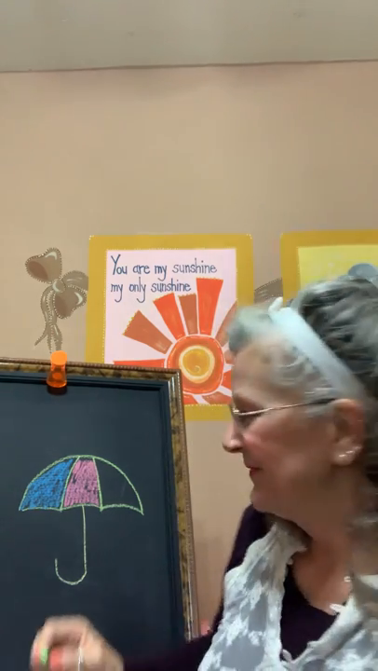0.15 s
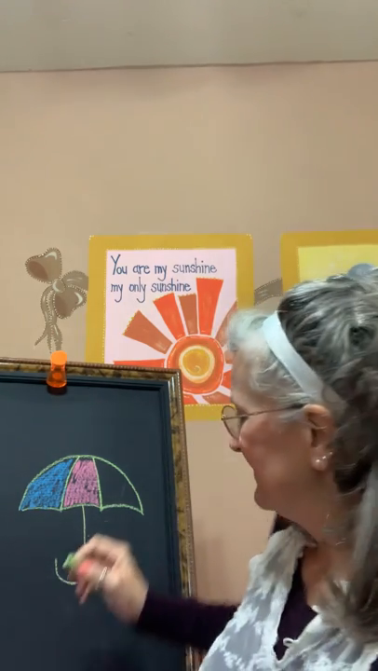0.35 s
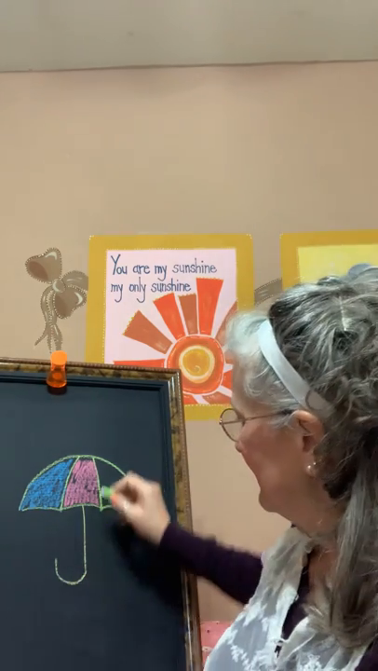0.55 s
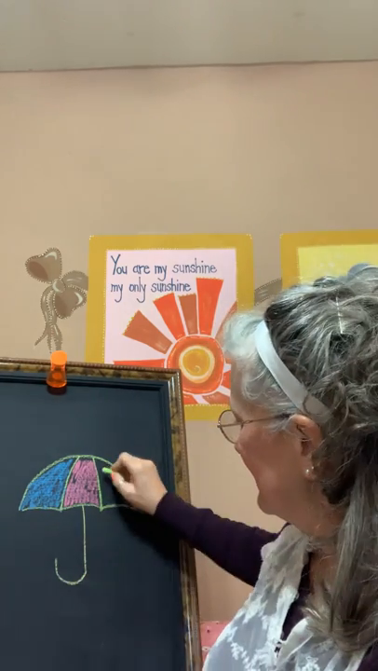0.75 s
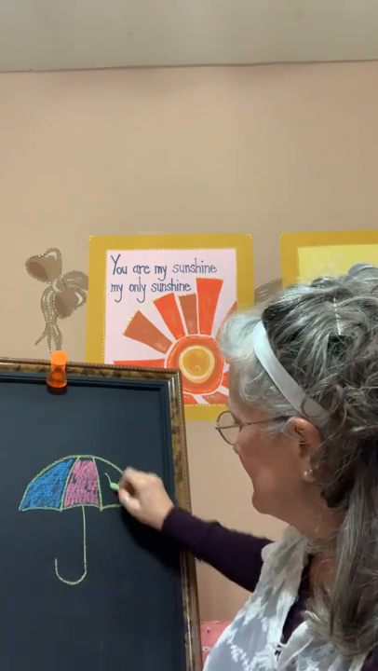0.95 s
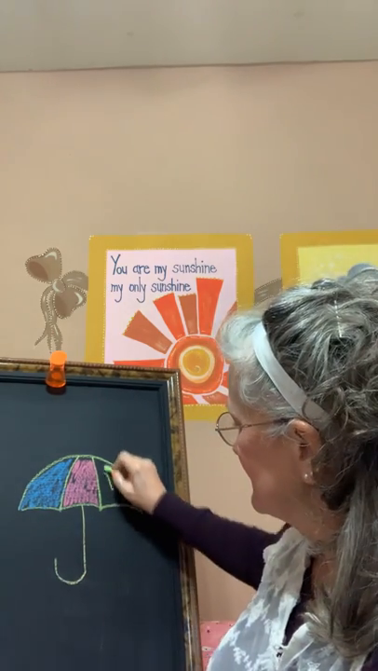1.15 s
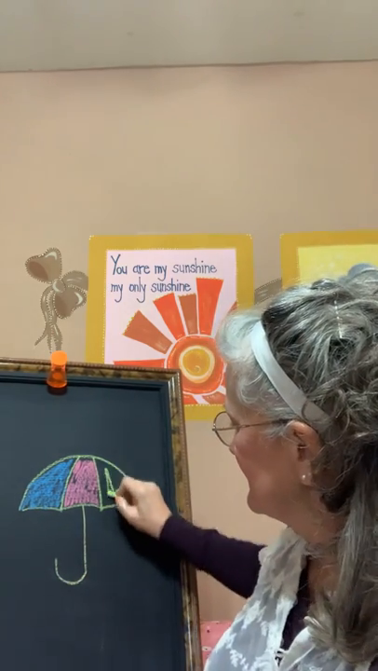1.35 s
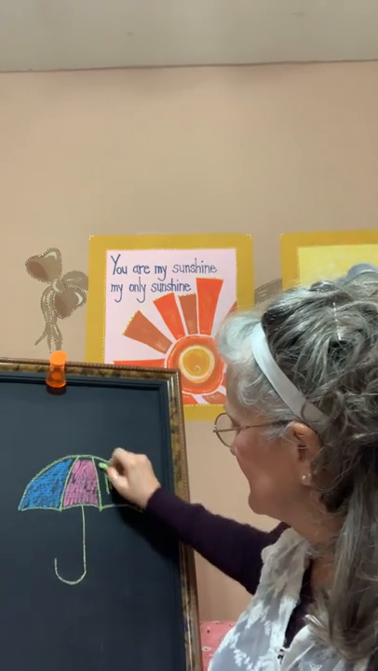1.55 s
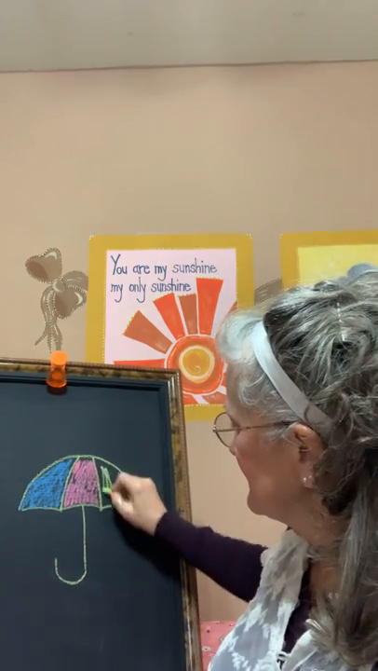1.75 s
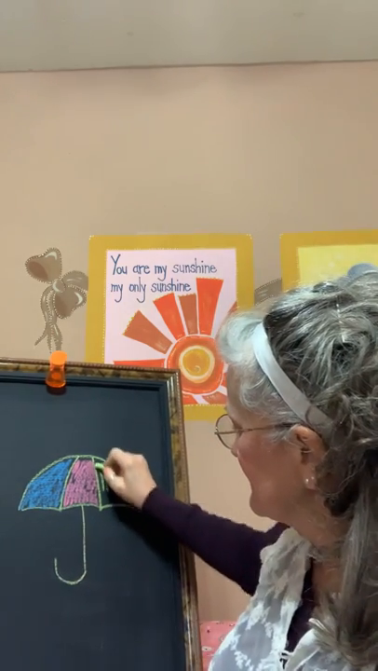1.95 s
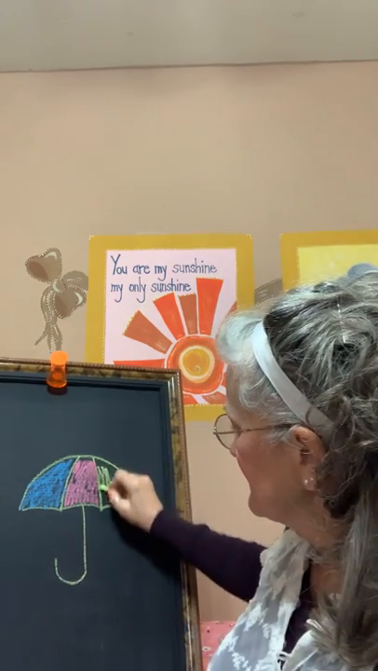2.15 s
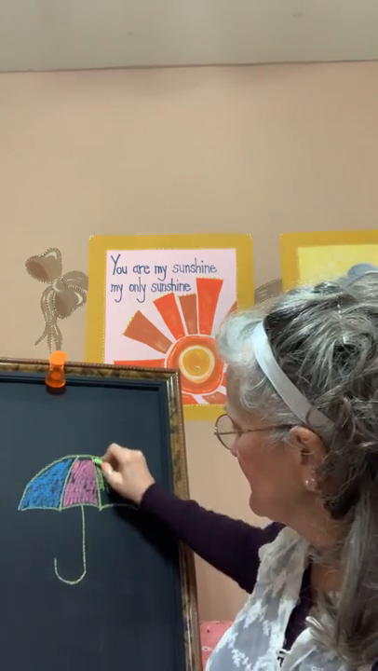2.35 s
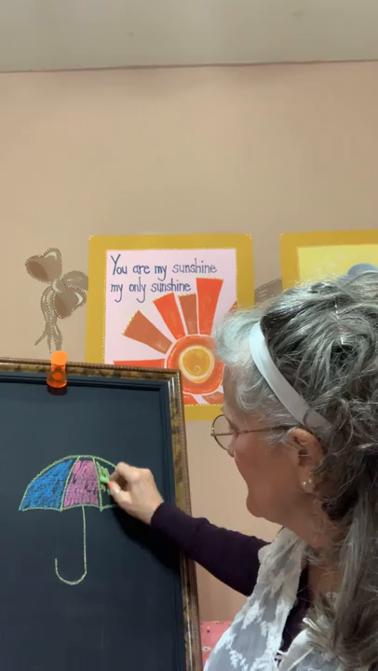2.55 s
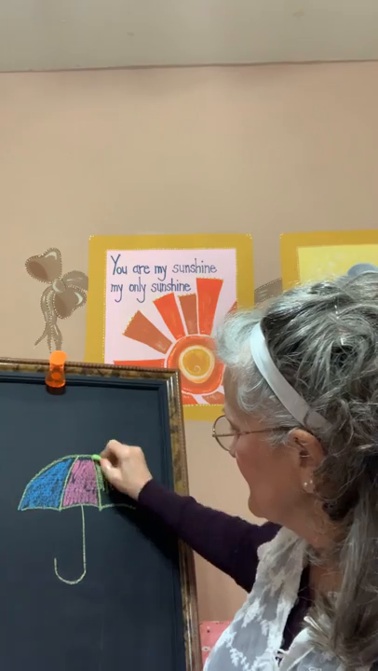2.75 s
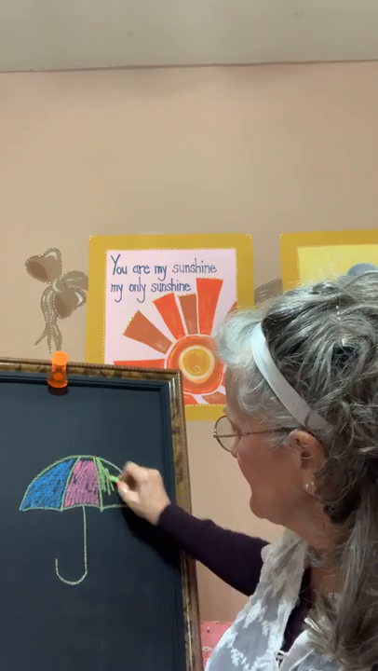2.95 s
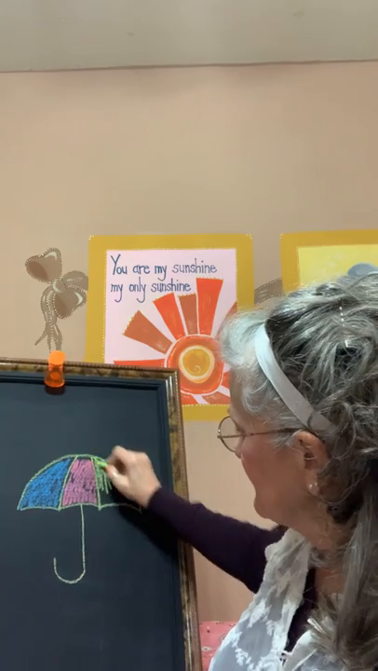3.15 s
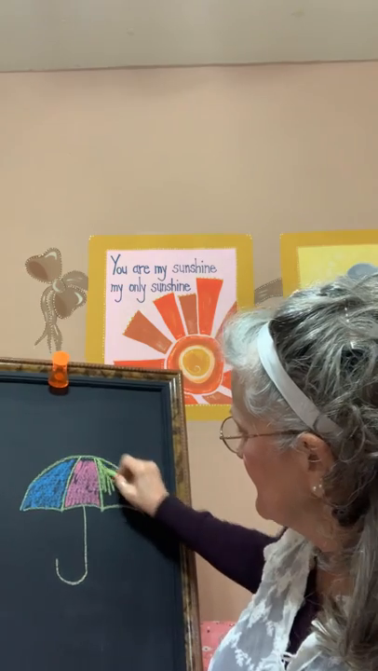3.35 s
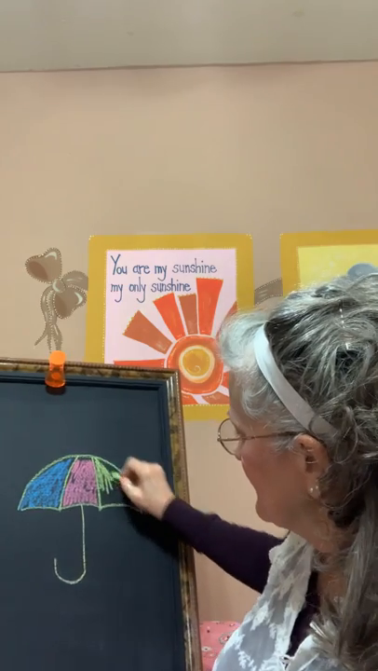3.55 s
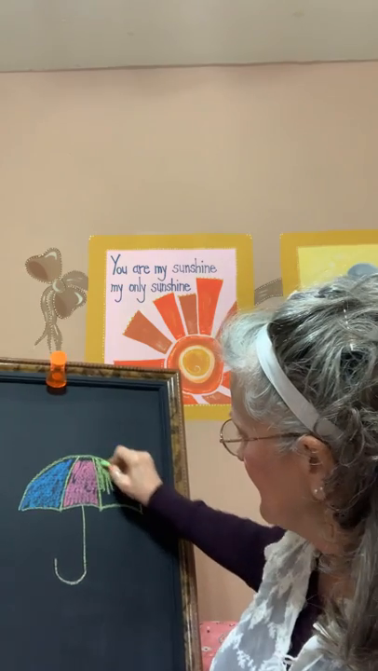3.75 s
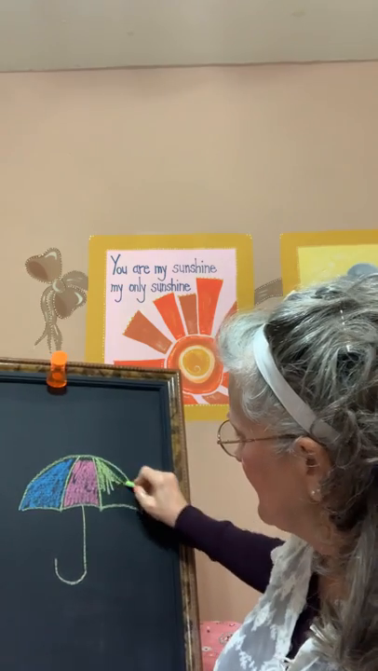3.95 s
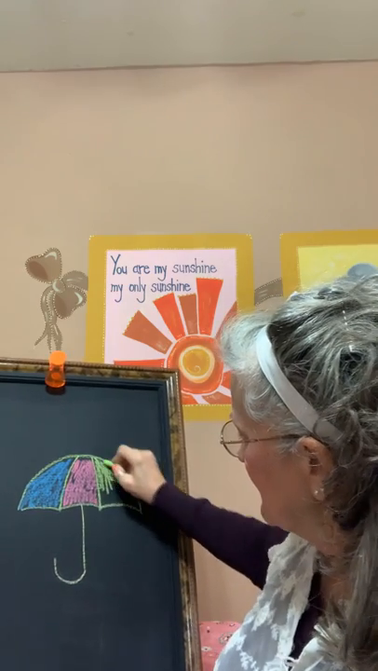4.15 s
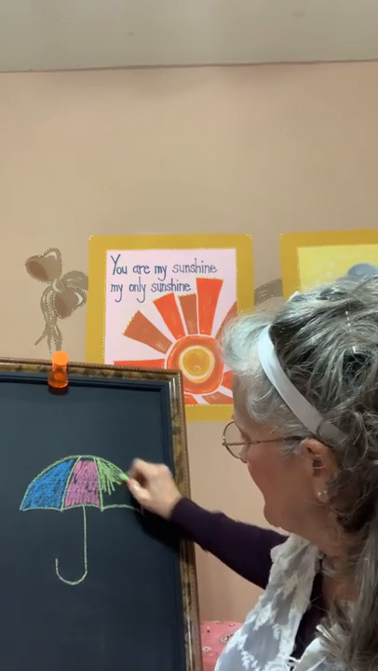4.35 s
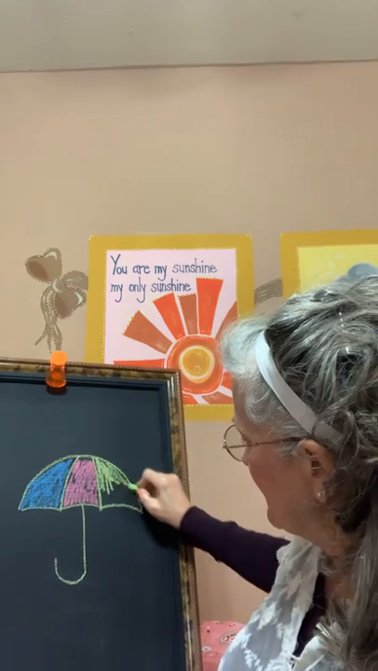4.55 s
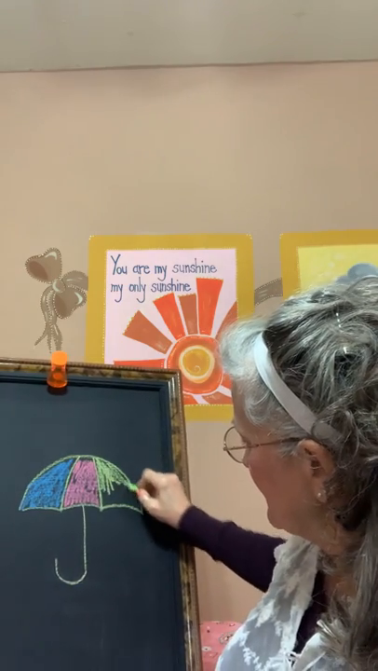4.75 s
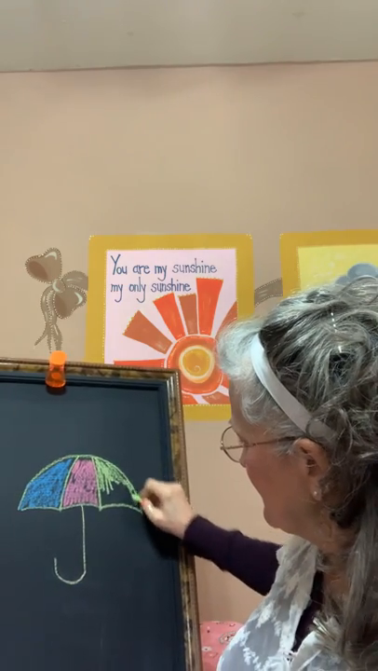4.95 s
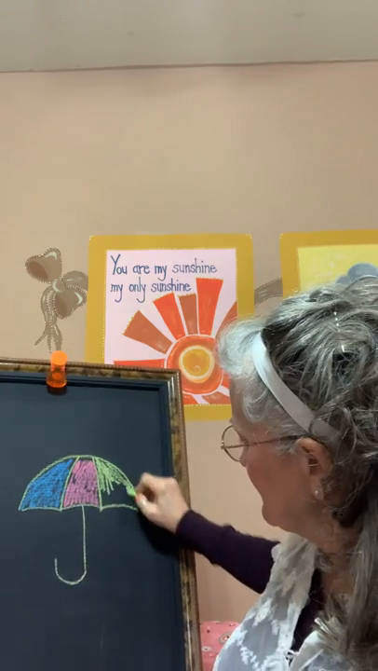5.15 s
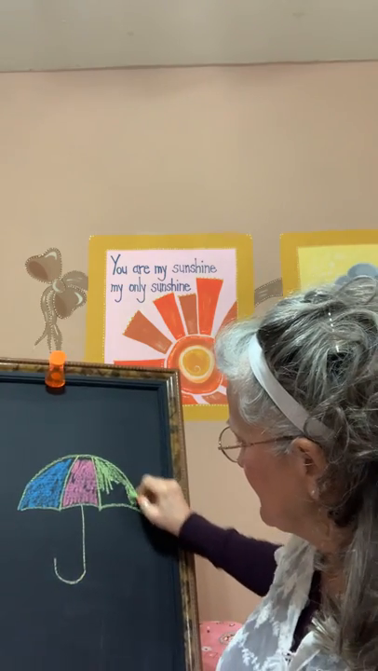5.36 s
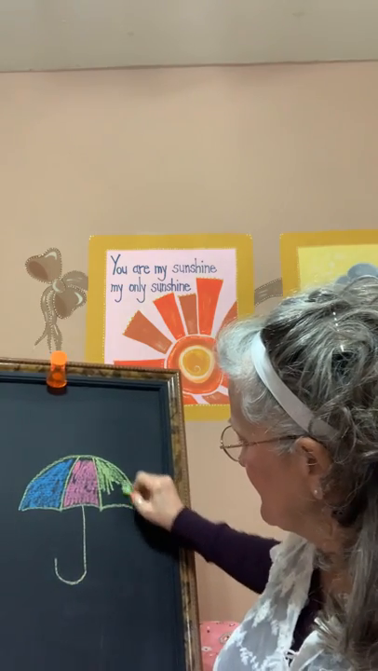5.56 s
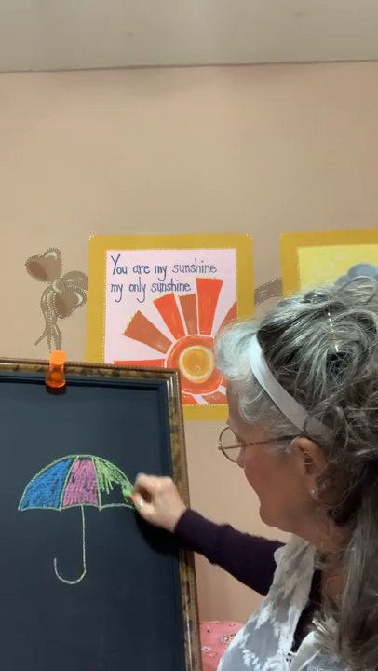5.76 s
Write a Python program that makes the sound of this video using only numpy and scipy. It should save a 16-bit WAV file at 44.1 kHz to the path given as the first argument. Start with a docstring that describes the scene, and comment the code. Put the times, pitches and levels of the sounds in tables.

```python
"""First a sleeve rustles as an arm rises, cloth sliding over cloth while its folds flap.
Then chalk knocks on a framed chalkboard and shades up and down. Each stroke hisses with its speed as
grains break off; chiefly on the down strokes the tip also sticks and slips, so the panel drums.
Toward the end the shading nears the frame, where the stiffer panel sounds hollower, and then it stops.
Throughout, a small room adds its reflections and a faint steady background."""
import sys
import numpy as np
from scipy import signal
from scipy.fft import rfft, irfft
from scipy.io import wavfile
from scipy.ndimage import uniform_filter1d

SR = 44100
rng = np.random.default_rng(int(sys.argv[2]) if len(sys.argv) > 2 else 0)


def dump_mix(stems):
    """Bounce the given channels to the path in sys.argv[1] as a 16-bit WAV at rate SR."""
    frames = np.atleast_2d(stems).T  # one column per channel
    limited = np.clip(frames, -1, 1)  # hard clip at full scale
    pcm = np.round(limited * 32767).astype(np.int16)
    wavfile.write(sys.argv[1], SR, pcm)


N = 256662
TIME = np.arange(N) / SR

# Strokes, up and down by turns, each lasting until the next; hold < 1 is a flick, > 1 an even pace:
# (start [s], relative hiss level [dB], treble tilt [dB], hold [exponent], judder level [dB])
STROKES = [(0.895, -58.5, -2.5, 1.27, -64.5), (1.079, -58, -0.5, 1.45, -48),
           (1.256, -55.8, 0.8, 1.7, -61.5), (1.443, -55, -3, 1.14, -45.5), (1.627, -53.5, 1.5, 0.86, -55.5),
           (1.822, -56, -4.5, 1.17, -44.5), (2.022, -52, 1, 0.52, -58.5), (2.203, -55, -1.5, 0.82, -45.5),
           (2.444, -57.4, -0.5, 0.66, -57), (2.632, -59.5, -3, 0.99, -40.5), (2.842, -56.5, 1.5, 0.87, -56),
           (3.08, -56, -4.5, 0.95, -42), (3.308, -56, 0.3, 0.83, -55), (3.548, -53.5, -1.5, 0.84, -43),
           (3.784, -54, 3.2, 0.79, -56.5), (4.024, -53.5, 1, 0.86, -43), (4.286, -54.5, 4, 0.87, -61),
           (4.559, -58.5, -11, 0.99, -47), (4.746, -57, -3, 1.09, -65), (4.957, -56, -9.5, 1.13, -44),
           (5.15, -57.5, -1.5, 1.05, -69), (5.348, -55, -5.4, 1.33, -45), (5.536, -54.6, 0.5, 0.95, -66.5),
           (5.746, -60, -9, 1.2, -45)]
LAST_STROKE_END_S = 5.956
# The tip lands or catches: (time [s], relative clack level [dB], relative thump level [dB])
KNOCKS = [(0.885, -54, -45.5), (1.388, -59.5, -51), (2.48, -67.5, -59), (3.334, -80, -48),
          (3.738, -73.5, -34.5), (3.785, -74, -46)]
# Resonances of the panel and its frame: (frequency [Hz], width [Hz], lift [dB])
BOARD_MODES = [(91.3, 27, 6.5), (112.8, 25.3, 8), (162.7, 25, 6), (197.7, 39.6, 11.5), (262, 12.4, 4.5),
               (306.2, 28, 8.5), (356, 20, 4.5), (389.3, 49, 9), (497, 29.4, 7.5), (540, 34, 4),
               (671, 46, 8), (734.6, 23.5, 6.5), (805, 8.8, 4), (873, 61, 6), (1037, 73, 1),
               (1060, 46, 7.5), (1171, 18, 7), (1376, 50, 8.5), (1540, 140, 2), (1803, 110, 2.5),
               (2070, 56, 4), (2326, 26, 6.5), (2980, 270, 3), (3520, 46, 6), (3700, 120, 2.5)]
# Spectra of the chalk's friction and impacts: (frequency [Hz], relative level [dB])
GRIT_SPECTRUM = [(40, -9.5), (100, 0), (250, -1), (600, 1.5), (1300, -0.5), (2200, -0.5), (3400, 0),
                 (4600, -3.5), (7000, -6), (10500, -11), (13000, -17), (16000, -19.5)]
SLIP_SPECTRUM = [(30, -25.5), (65, -11.5), (95, -3), (150, 4.5), (200, 2.5), (290, 0), (390, -1), (600, -5),
                 (1300, -12), (2000, -18), (3200, -30), (6000, -31), (16000, -61)]
CLACK_SPECTRUM = [(60, -11), (300, -7.5), (600, -5), (850, 1.5), (1400, -2), (2500, -9), (4000, -28),
                  (8000, -32), (16000, -48)]
THUMP_SPECTRUM = [(30, -26), (90, -1), (190, 10.5), (350, -9), (700, -17), (3000, -79), (16000, -73)]
# The stick rings more when pushed up than when pulled down: (frequency [Hz], gain [dB])
PUSH_COLOUR = [(100, 0), (200, -7.5), (330, -7.5), (510, 1), (1000, -0.5), (2400, -1), (3100, -1),
               (3750, 1), (5000, 0.5), (16000, 1)]
# The shading works its way across to the frame: (time [s], nearness [0-1])
FRAME_NEARNESS = [(4.3, 0), (4.55, 1)]
# Colour of the stiffer panel there: (frequency [Hz], gain [dB])
FRAME_COLOUR = [(60, -5), (100, -11.5), (150, 5.5), (230, -2.5), (320, 2), (450, 2), (590, -6.5),
                (950, 0.5), (1400, -3.5), (2400, 0.5), (4200, 2), (8000, -2.5), (13000, 0.5)]
# Spectra of sliding cloth, flapping folds and the background: (frequency [Hz], relative level [dB])
SLIDE_SPECTRUM = [(100, -17), (900, 10.5), (2000, 0.5), (3500, 1), (5600, -1), (7500, -13), (12000, -19),
                  (16000, -25)]
FLAP_SPECTRUM = [(30, -27), (70, -10), (110, 0), (150, -4.5), (250, -6.5), (550, -11), (1000, -25.5),
                 (1800, -28.5), (16000, -48)]
BACKGROUND_SPECTRUM = [(25, -27), (65, -3), (90, -3), (115, -0.5), (160, -13), (250, -16.5), (650, -19),
                       (1500, -26.5), (5000, -34), (13000, -37), (16000, -53)]
# Reverberation time of the room: (frequency [Hz], time to fall 60 dB [s])
ROOM_T60 = [(150, 0.76), (1000, 0.14), (4000, 0.04), (14000, 0.04)]
# Reflections relative to the direct sound: (frequency [Hz], level [dB])
ROOM_REFLECTIONS = [(100, -8.5), (500, -9.5), (1500, -2.5), (5000, -3), (14000, -11)]


def chalk_hiss(speed, upward, hiss_db, bright_db, creep=0.1, slow_treble_db=-16):
    """Abrasion: countless grains break off the tip, louder and brighter the faster it slides."""
    tilt_db = bright_db + slow_treble_db * (1 - speed)
    grains = rng.standard_normal(N) * gain_of(wander(500) + 0.77 * wander(38))
    # (frequency [Hz], share of the tilt [ratio])
    treble_share = [(1300, -0.27), (3500, 0.14), (10000, 0.8), (16000, 0.79)]
    streak_depth = [(300, .5), (1500, 2), (16000, 2.2)]  # (frequency [Hz], rms depth [dB])

    def colour_db(hz, s):
        tilt = at_frequency(treble_share, hz) * np.interp(s, TIME, tilt_db)
        push = at_frequency(PUSH_COLOUR, hz) * np.interp(s, TIME, upward)
        # the travelling tip meets the panel's high modes at changing places
        return tilt + push + at_frequency(streak_depth, hz) * streaks(tilt.shape)

    hiss = recolour(unit_rms(grains), colour_db, size=512)
    touching = TIME > STROKES[0][0]
    envelope = touching * gain_of(hiss_db + 4) * (creep + speed ** 1.15)
    return resonate(hiss * envelope, GRIT_SPECTRUM, BOARD_MODES)


def chalk_judder(progress, speed, upward, judder_db, open_hz=238.6, frame_hz=299.6, sag_octaves=.35):
    """Stick-slip friction: each slip kicks the panel, at an unsteady rate that sags along the stroke."""
    mid_stroke_hz = open_hz + (frame_hz - open_hz) * nearness(TIME)
    rate_hz = mid_stroke_hz * 2 ** (sag_octaves * (.5 - progress))
    cycles = np.cumsum(rate_hz * np.exp(.4 * wander(160))) / SR
    slips = np.diff(np.floor(cycles), prepend=0) * gain_of(2.17 * wander(260))
    kicks = disperse(unit_rms(slips - uniform_filter1d(slips, size=600)))
    # slow slips are soft, fast ones sharp
    tilt_db = -9 * (1 - speed)
    treble_share = [(350, 0.012), (1200, 0.93)]  # (frequency [Hz], share of the tilt [ratio])
    kicks = recolour(kicks, lambda hz, s: at_frequency(treble_share, hz) * np.interp(s, TIME, tilt_db))
    # after a turn the tip stays stuck for a moment, then breaks loose
    stuck, grip, release = 0.022, 0.073, 0.17  # shares of the stroke
    pressure = np.clip((progress - stuck) / grip, 0, 1) * np.clip((1 - progress) / release, 0, 1)
    lean_db = np.where(upward, 2, 3.5)  # the hand bears down along the stroke, less so going up
    force_db = judder_db + lean_db * np.interp(progress, [.2, .65], [-.5, .5]) + 1.2 * wander(40)
    swell_db = 3 * (speed - .5)  # faster sliding kicks harder
    return resonate(kicks * pressure * gain_of(force_db + swell_db), SLIP_SPECTRUM, BOARD_MODES)


def chalk_knocks(blow_db=24.5, chatter_db=-13, chatter_s=0.028):
    """Impact excitation: a blow of the tip clacks and thumps, with a brief chatter as it settles."""
    clacks, thumps = np.zeros((2, N))
    t = TIME[:SR // 10]
    for start_s, clack_db, thump_db in KNOCKS:
        chatter = gain_of(chatter_db) * rng.standard_normal(len(t)) * np.exp(-t / chatter_s)
        at = round(start_s * SR)
        clacks[at:at + len(t)] += gain_of(clack_db) * ((t == 0) + chatter)
        thumps[at] += gain_of(thump_db)
    blows = resonate(clacks, CLACK_SPECTRUM, BOARD_MODES) + resonate(thumps, THUMP_SPECTRUM)
    return gain_of(blow_db) * blows


def hand_motion(fastest_up=.53, fastest_down=.48):
    """Reciprocating motion: the hand halts at each turn and is fastest near the middle of a stroke."""
    turns = np.r_[np.array(STROKES)[:, 0], LAST_STROKE_END_S]
    place = np.interp(TIME, turns, np.arange(len(turns)))
    stroke = np.minimum(place.astype(int), len(STROKES) - 1)
    progress, upward = place - stroke, 1 - stroke % 2
    _, hiss_db, bright_db, hold, judder_db = np.array(STROKES)[stroke].T
    fastest = np.where(upward, fastest_up, fastest_down)  # progress at top speed
    swing = abs(np.sin(np.pi * progress ** (np.log(.5) / np.log(fastest))))
    speed = 1 - (1 - swing) ** hold
    return progress, speed, upward, hiss_db, bright_db, judder_db


def disperse(x, delay_s=0.004022, at_hz=300):
    """Dispersion: higher bending waves cross the panel faster, so a kick smears into a short chirp."""
    hz = np.fft.rfftfreq(N, 1 / SR)
    return irfft(rfft(x) * np.exp(-4j * np.pi * delay_s * np.sqrt(at_hz * hz)), N)


def frame_stiffening(x):
    """Edge stiffness: near the frame the panel yields less, so its boom fades and it sounds hollower."""
    return recolour(x, lambda hz, s: at_frequency(FRAME_COLOUR, hz) * nearness(s), size=1024)


def sleeve(slide_db=-65, fade_db_per_s=53, slows_s=0.23, flap_db=-62.5, rests_s=0.496, settle_s=.03):
    """Sliding friction: cloth on cloth fades as the arm slows; the folds flap softly until it rests."""
    sliding = gain_of(slide_db - fade_db_per_s * np.maximum(TIME - slows_s, 0))
    flapping = gain_of(flap_db) * np.clip(1 - (TIME - rests_s) / settle_s, 0, 1)
    weave = rng.standard_normal(N) * sliding * gain_of(2 * wander(150))
    folds = rng.standard_normal(N) * flapping * gain_of(3 * wander(39))
    return resonate(weave, SLIDE_SPECTRUM) + resonate(folds, FLAP_SPECTRUM)


def room(x, first_echo_s=0.00293):
    """Reverberation: dense reflections from the near walls decay exponentially, band by band."""
    t = TIME[:SR // 2]
    echoes = rng.standard_normal(len(t)) * (t > first_echo_s)

    def decay_db(hz, s):
        t60 = at_frequency(ROOM_T60, hz)
        unit_energy_db = 10 * np.log10(2 * np.log(1000) / (t60 * SR))
        return at_frequency(ROOM_REFLECTIONS, hz) + unit_energy_db - 60 * s / t60

    return x + signal.oaconvolve(x, recolour(echoes, decay_db))[:N]


def background(level_db=-72.5):
    """Stationary noise: a faint, steady rumble."""
    return gain_of(level_db) * resonate(rng.standard_normal(N), BACKGROUND_SPECTRUM)


def resonate(x, spectrum, modes=(), size=16384):
    """Resonance: modal peaks stand on a broad spectrum in a minimum-phase filter of unit energy."""
    hz = np.fft.rfftfreq(size, 1 / SR)
    peaks_db = sum(lift / (1 + (2 * (hz - f) / width) ** 2) for f, width, lift in modes)
    db = at_frequency(spectrum, hz) + peaks_db
    log_gain = np.log(gain_of(np.r_[db, db[-2:0:-1]]))
    transfer = np.exp(np.conj(signal.hilbert(log_gain)))
    response = np.fft.ifft(transfer).real[:size // 2]
    return signal.oaconvolve(x, response / np.linalg.norm(response))[:N]


def recolour(x, db_at, size=256):
    """Time-varying filtering: each short-time spectrum takes the gain db_at(frequency, time)."""
    frames = dict(fs=SR, nperseg=size, noverlap=size - size // 4)
    hz, t, spectra = signal.stft(x, **frames)
    return signal.istft(spectra * gain_of(db_at(hz[:, None], t)), **frames)[1][:len(x)]


def wander(cutoff_hz):
    """Random modulation: low-passed noise of rms 1."""
    hz = np.fft.rfftfreq(N, 1 / SR)
    return unit_rms(irfft(rfft(rng.standard_normal(N)) / (1 + (hz / cutoff_hz) ** 4), N))


def streaks(shape, bins=3, frames=26):
    """Correlated noise: slowly shifting streaks of rms 1 over frequency and time."""
    field = rng.standard_normal(shape)
    for axis, length in enumerate((bins, frames)):
        field = uniform_filter1d(uniform_filter1d(field, length, axis), length, axis)
    return unit_rms(field)


def nearness(s):
    """Point of excitation: 0 on the open panel, 1 beside the frame."""
    return np.interp(s, *np.transpose(FRAME_NEARNESS))


def at_frequency(table, hz):
    """Interpolation along a log-frequency axis."""
    f, value = np.transpose(table)
    return np.interp(np.log(hz + 1), np.log(f + 1), value)


def gain_of(db):
    """Decibels to amplitude."""
    return 10 ** (np.asarray(db) / 20)


def unit_rms(x):
    """Normalisation to rms 1."""
    return x / np.sqrt(np.mean(x ** 2) + 1e-20)


def scene():
    """Superposition: chalk and sleeve sound in the room, over its steady background."""
    progress, speed, upward, hiss_db, bright_db, judder_db = hand_motion()
    drumming = chalk_judder(progress, speed, upward, judder_db)
    chalk = chalk_hiss(speed, upward, hiss_db, bright_db) + drumming + chalk_knocks()
    return (background() + room(frame_stiffening(chalk) + sleeve()))[None]


def record(dry, cutoff_hz=15750):
    """Band limiting: a steep low-pass filter removes the highest treble."""
    low_pass = signal.firwin(511, cutoff_hz, window=("kaiser", 9), fs=SR)
    return signal.oaconvolve(dry, low_pass[None], "same")


dry = scene()
out = record(dry)
dump_mix(out)
```